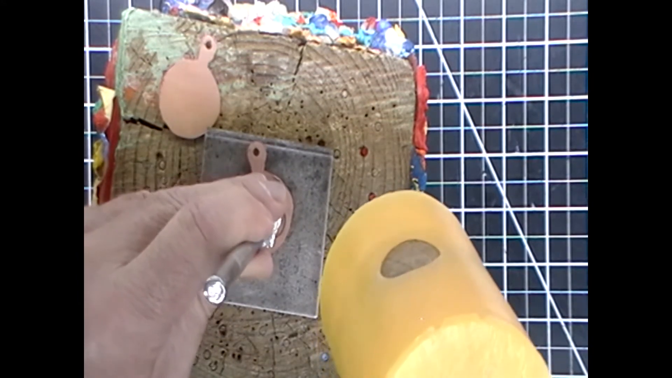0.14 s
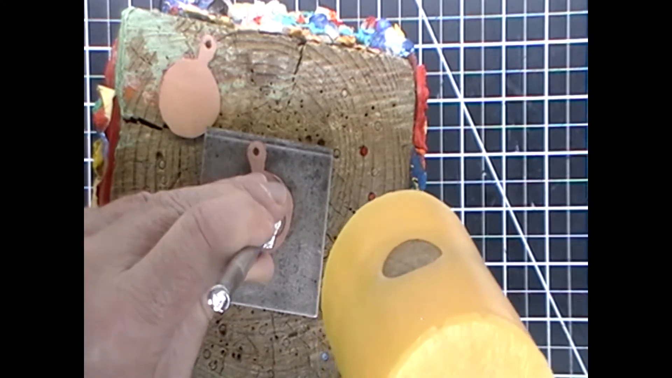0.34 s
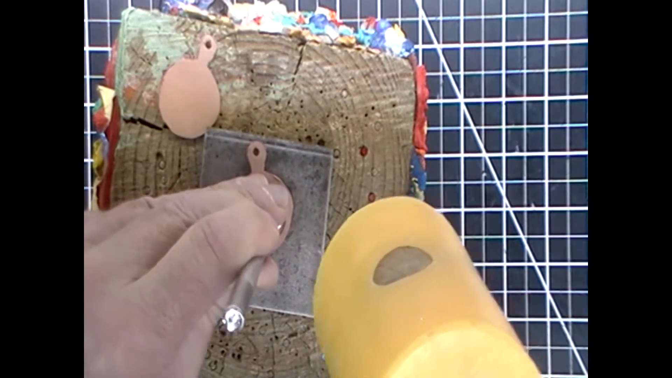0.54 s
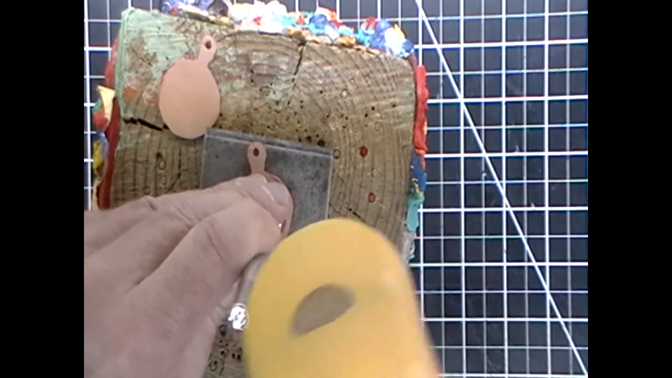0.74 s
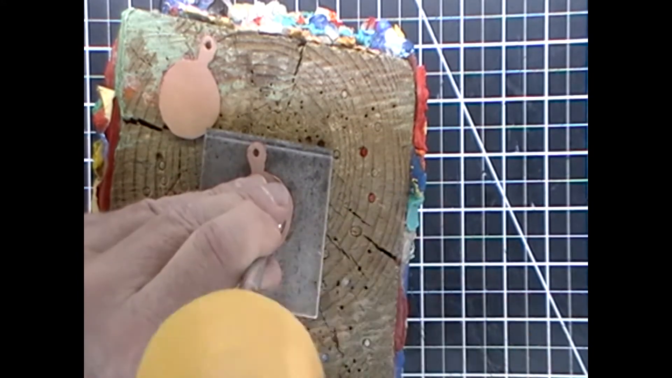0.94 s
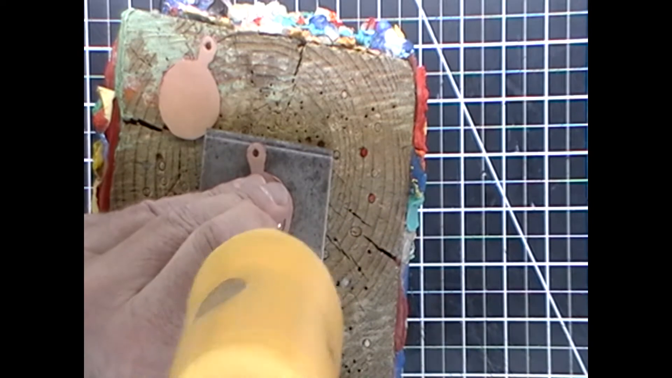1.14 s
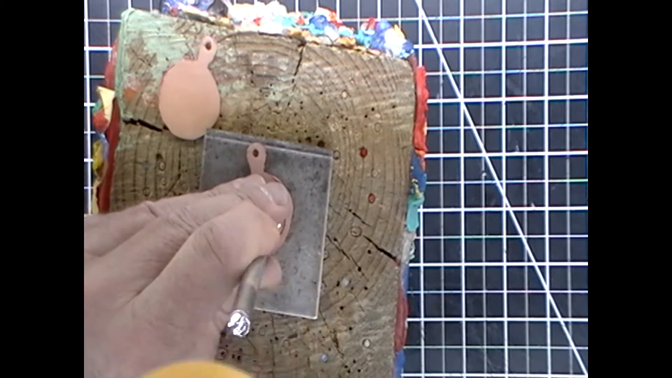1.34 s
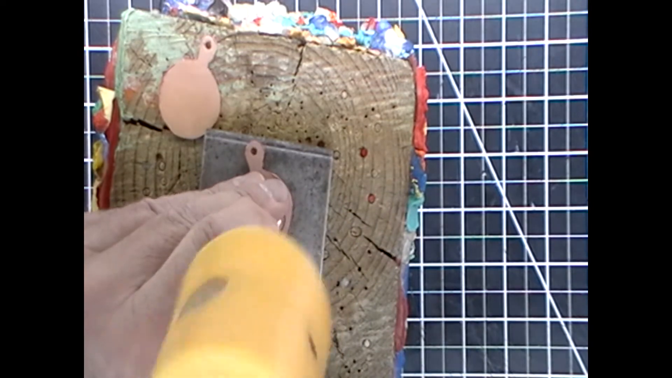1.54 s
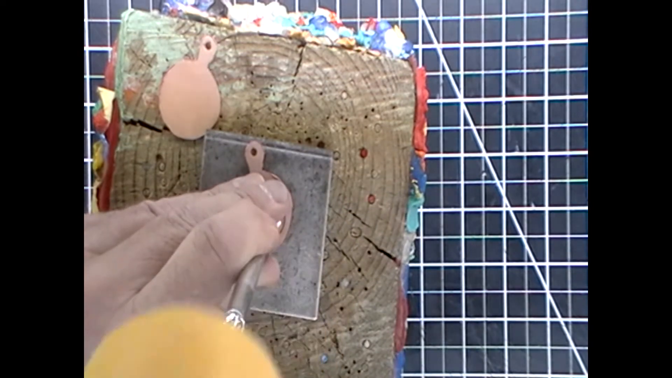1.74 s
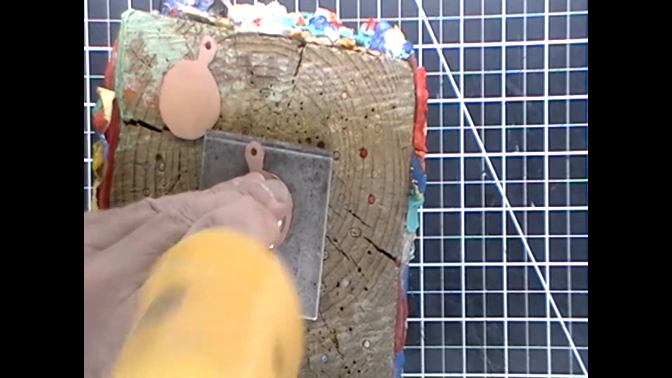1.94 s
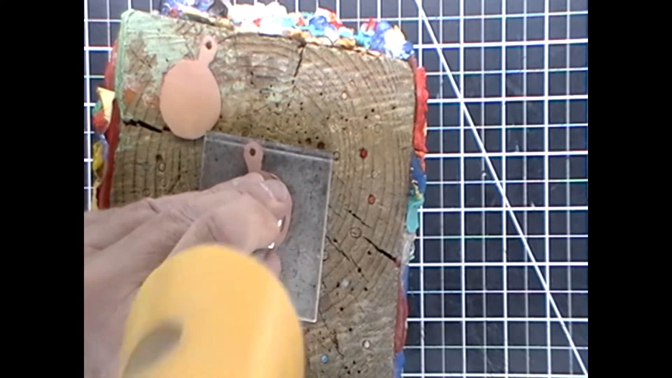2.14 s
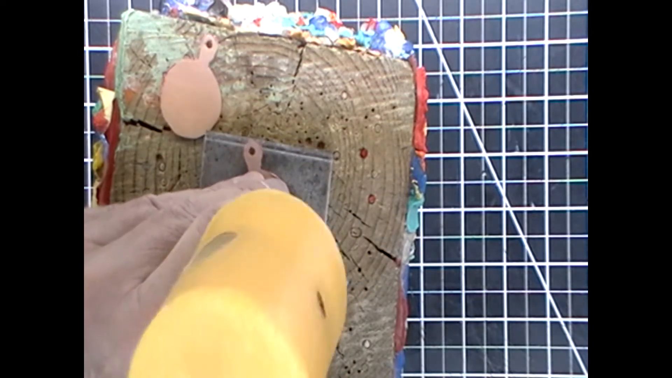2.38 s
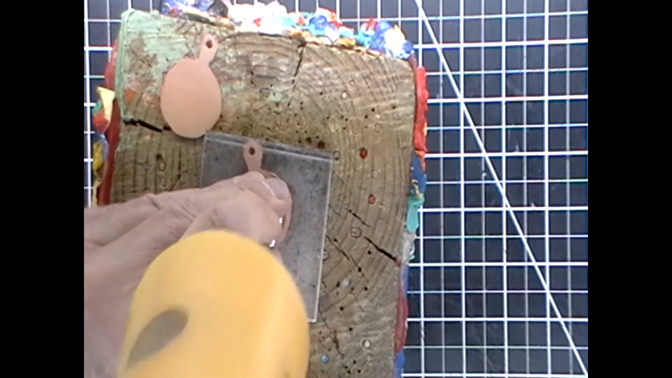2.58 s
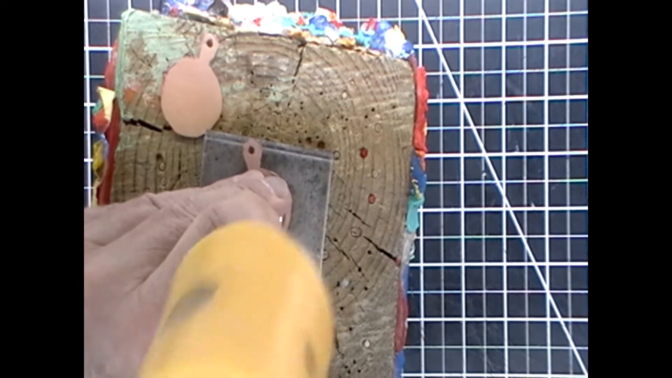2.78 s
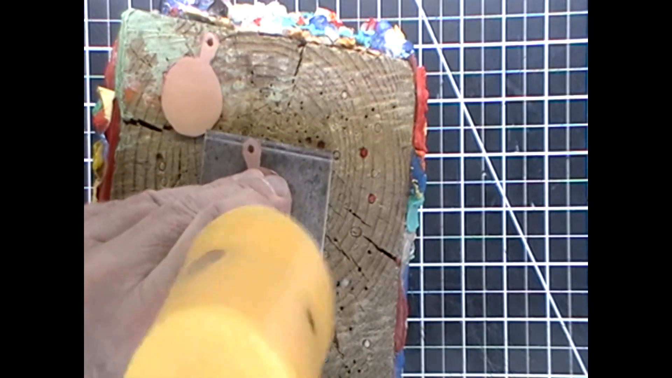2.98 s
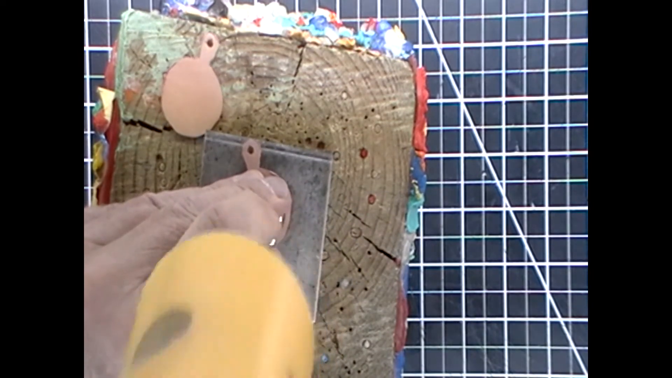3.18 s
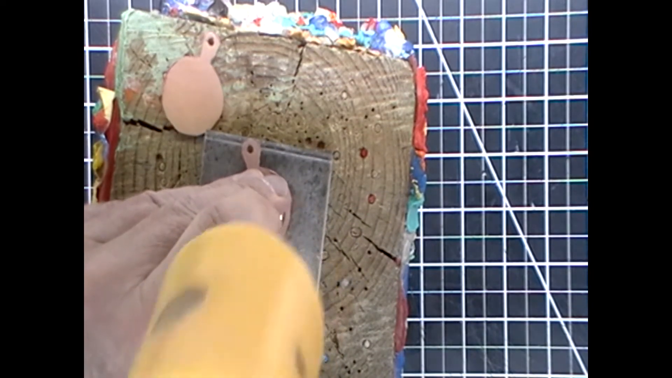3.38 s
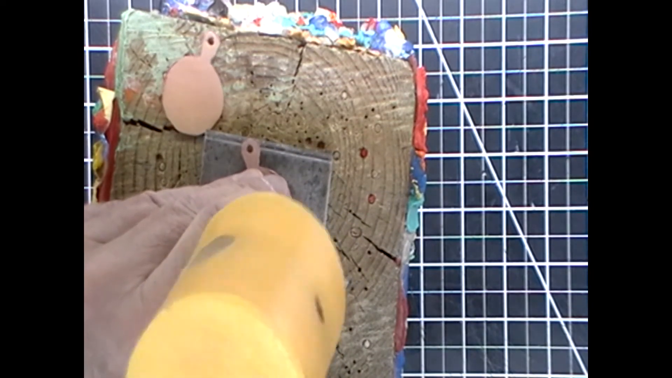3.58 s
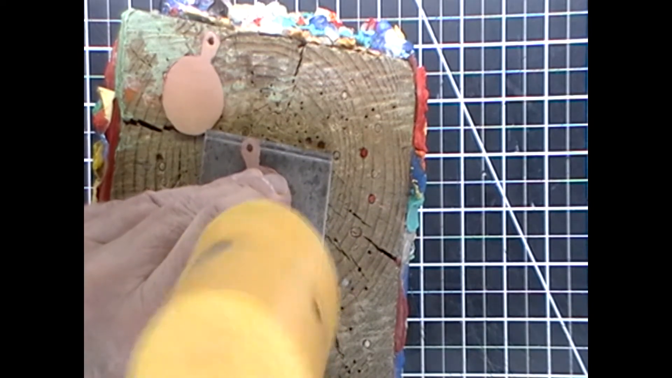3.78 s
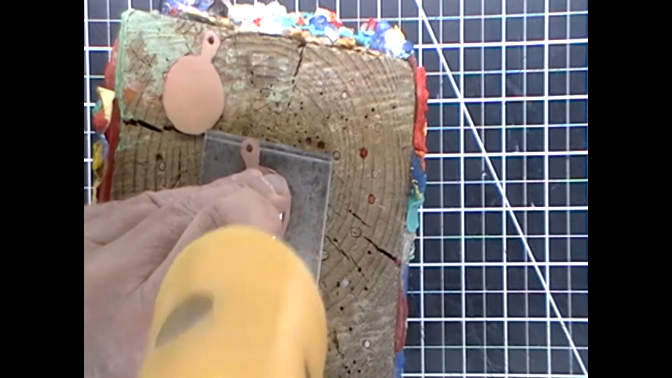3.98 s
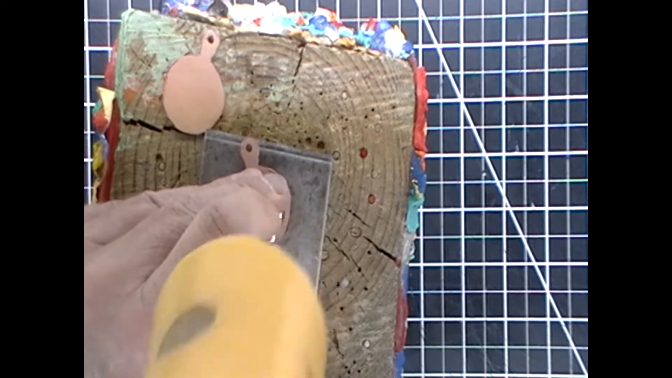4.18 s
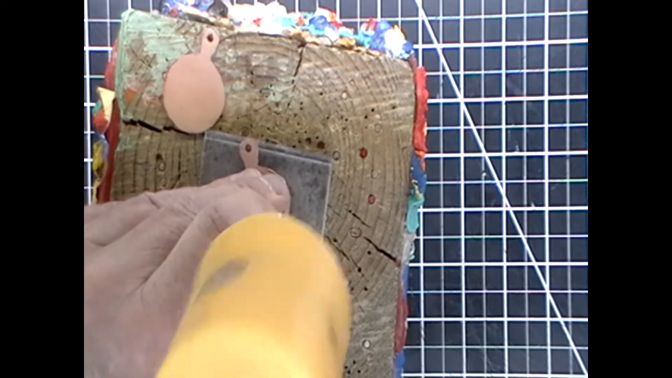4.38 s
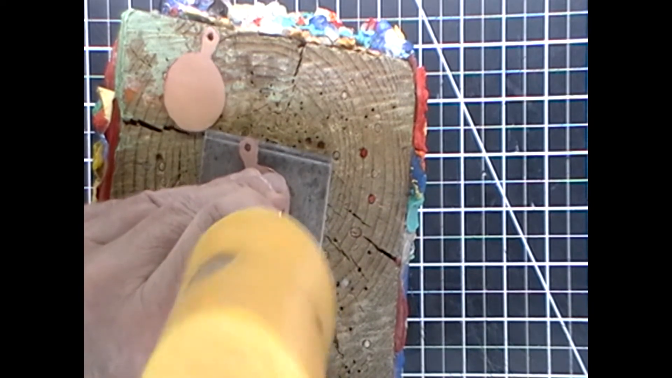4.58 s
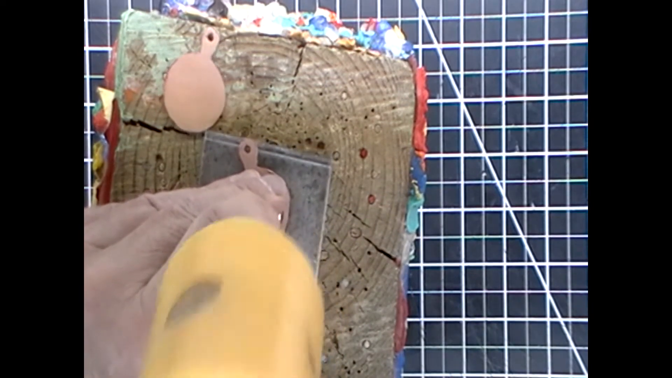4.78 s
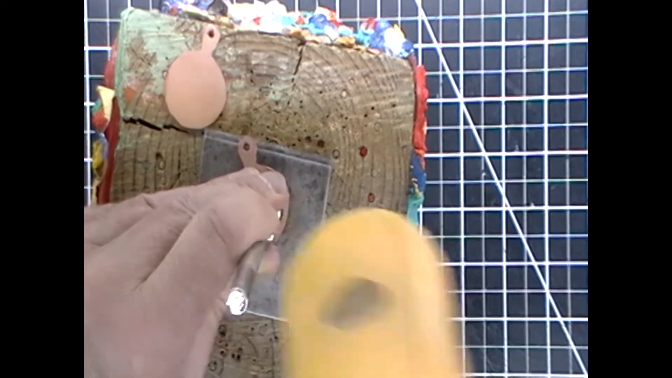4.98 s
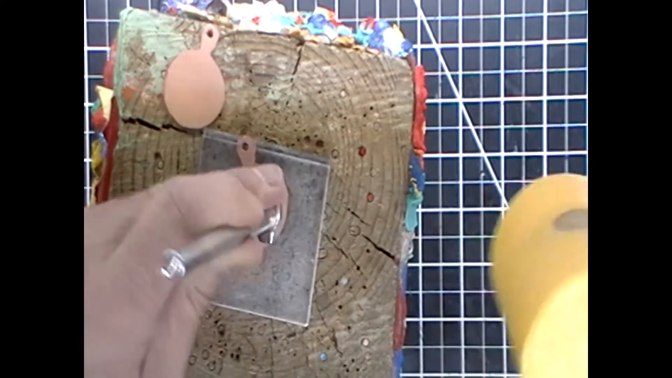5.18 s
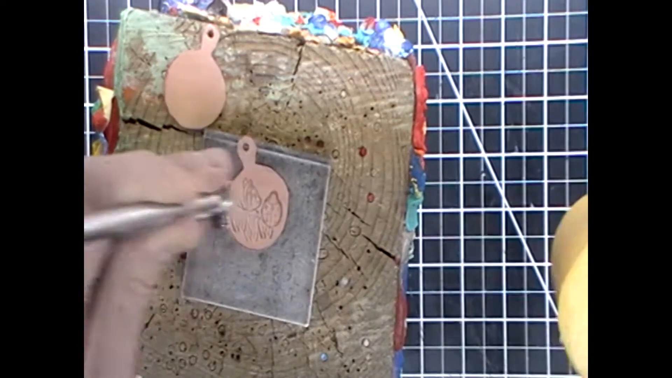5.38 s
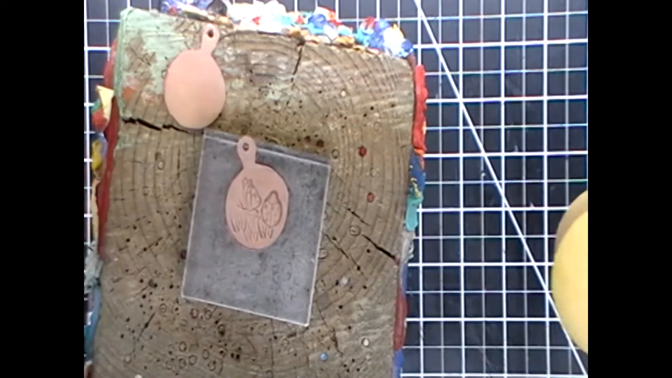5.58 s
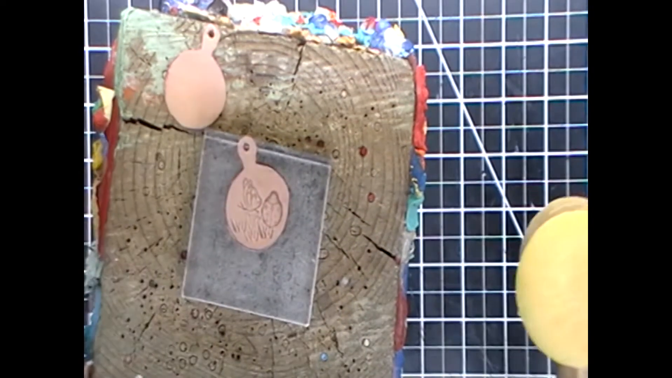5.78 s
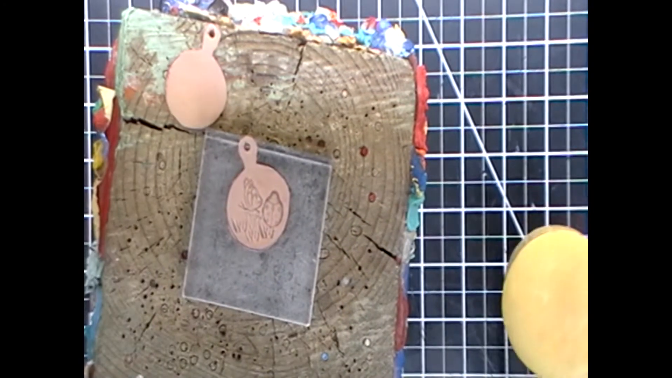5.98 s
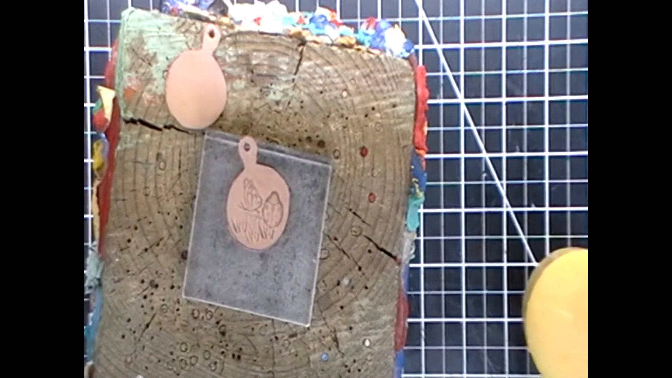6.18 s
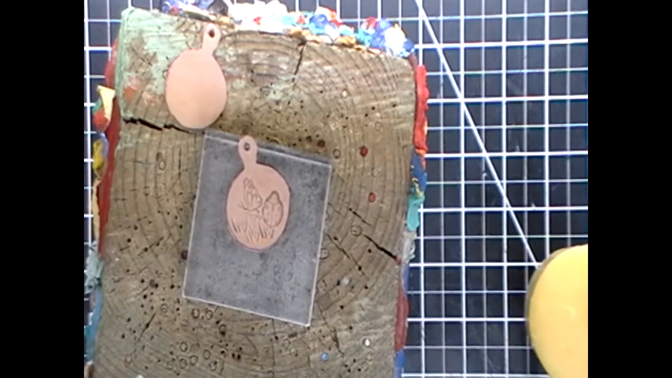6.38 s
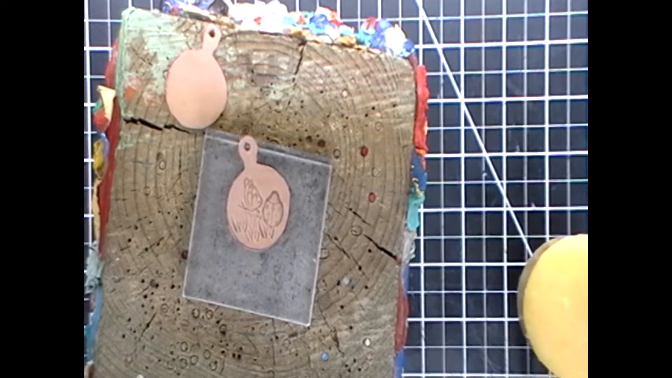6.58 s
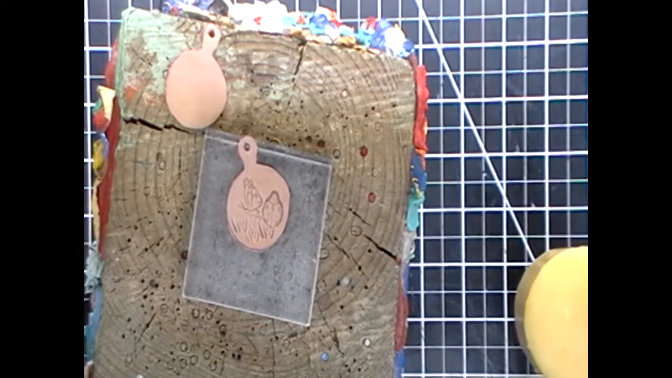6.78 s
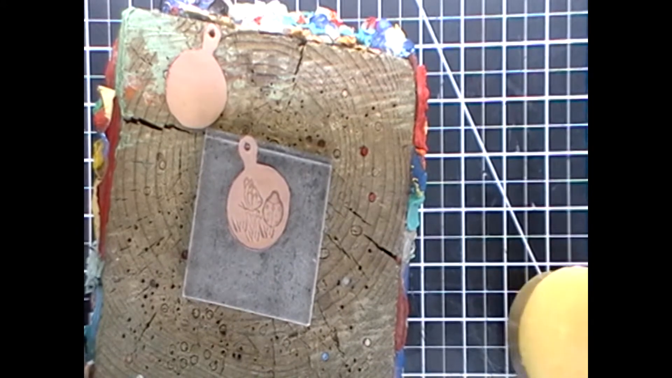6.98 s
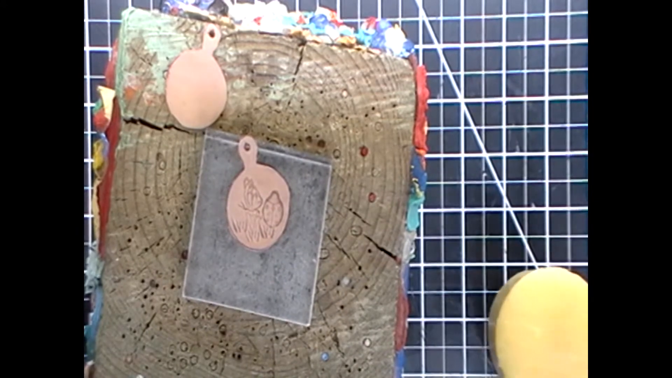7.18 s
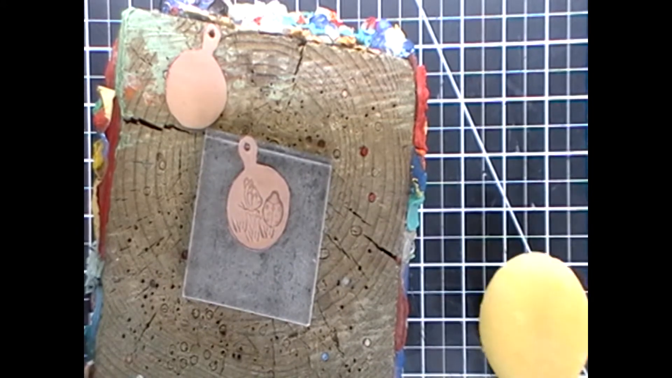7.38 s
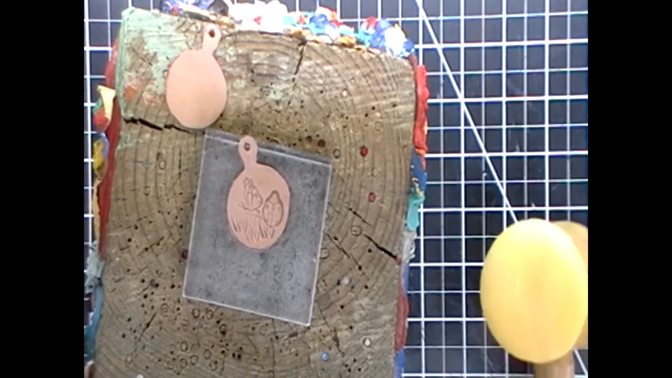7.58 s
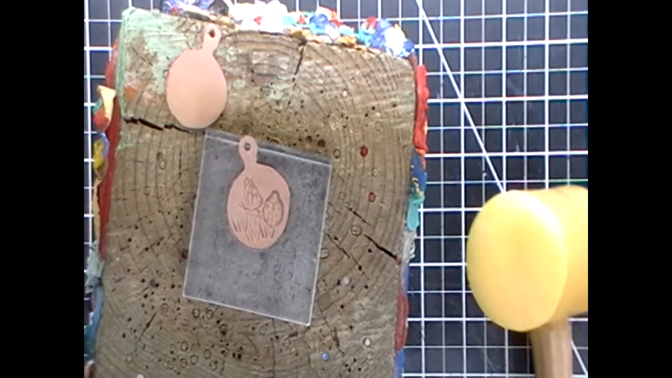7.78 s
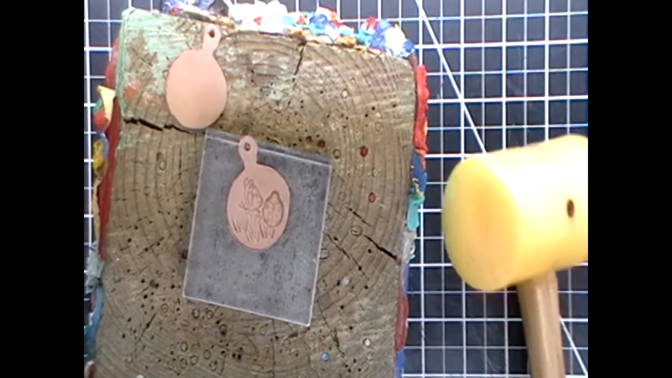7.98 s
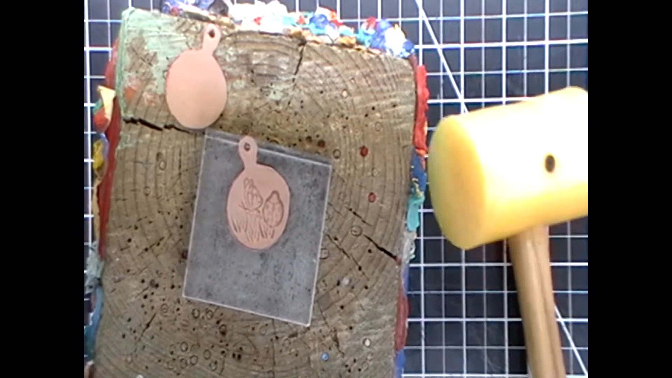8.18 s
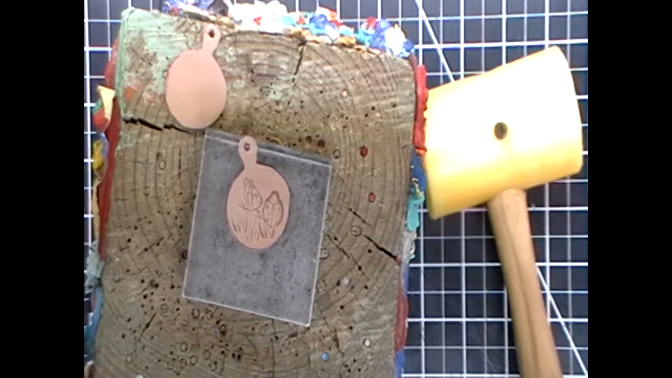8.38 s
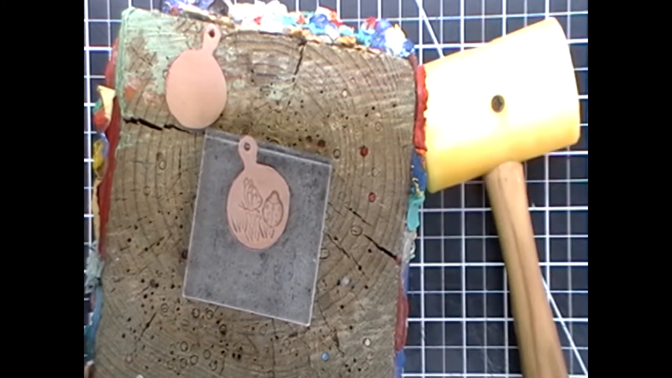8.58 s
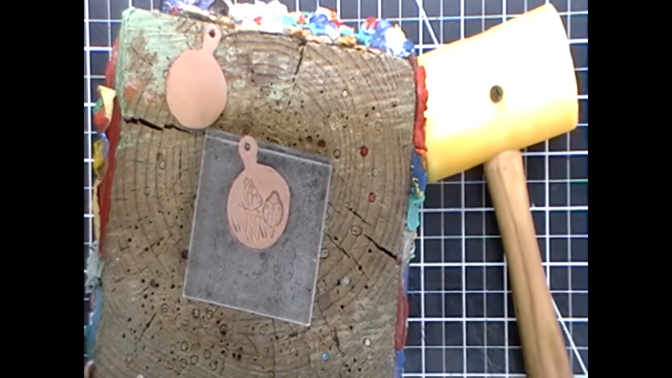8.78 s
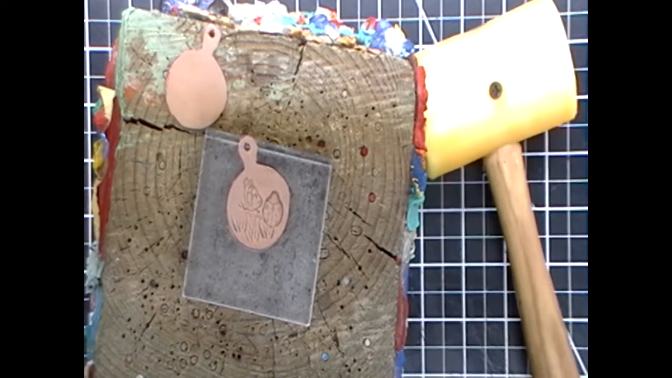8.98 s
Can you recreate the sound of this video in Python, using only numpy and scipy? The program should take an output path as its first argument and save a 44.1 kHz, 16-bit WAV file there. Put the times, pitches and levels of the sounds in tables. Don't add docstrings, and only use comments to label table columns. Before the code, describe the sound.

Close up in a small quiet workshop with a low fan hum, a plastic mallet hammers a steel stamp on a steel block over a wooden slab. Thirteen loud, sharp clacks come faster as they go, shaking the bench and overloading the microphone. The last ones have softer rebounds. After a pause come two desk knocks, wooden scrapes and bumps, a tiny metal clink, and the mallet laid down with a solid knock.

```python
import sys
import numpy as np
from scipy import signal
from scipy.fft import rfft, irfft
from scipy.io import wavfile
from scipy.ndimage import uniform_filter1d

SR = 44100
rng = np.random.default_rng(int(sys.argv[2]) if len(sys.argv) > 2 else 0)


def int16_out(signal):
    q = np.round(np.clip(np.atleast_2d(signal).T, -1, 1) * 32767)
    wavfile.write(sys.argv[1], SR, q.astype(np.int16))


def attenuation_scalar(level_db):
    decades = np.asarray(level_db, float) / 20
    return 10 ** decades


N = 398663


def evened(x):
    return x / np.sqrt(np.mean(x ** 2) + 1e-20)


def read(points, hz):
    f, value = np.transpose(points)
    return np.interp(np.log(hz + 1), np.log(f + 1), value)


def add(mix, s, sound):
    part = mix[:, round(s * SR):][:, :sound.shape[-1]]
    part += sound[..., :part.shape[1]]


def coloured(x, gain_db):
    size = x.shape[-1]
    gain = attenuation_scalar(gain_db(np.fft.rfftfreq(size, 1 / SR)))
    return irfft(rfft(x) * gain, size)


def smoothed_noise(shape, across, along):
    patches = uniform_filter1d(rng.standard_normal(shape), across, axis=0)
    return evened(uniform_filter1d(patches, along, axis=1))


def wide_noise(size, same, treble=0.):
    shared, apart = rng.standard_normal((2, size))
    apart = apart + treble * np.diff(apart, prepend=0)
    return shared + np.sqrt(np.clip(1 - same, 0, 1)) * apart * [[1], [-1]]


def stroke(rise, fall):
    ends_db, roundness = -22, 1.5
    t = np.arange(0, rise + fall, 1 / SR)
    return np.interp(t, [0, rise, rise + fall], [1, 0, 1]) ** roundness * ends_db


def rings(modes, bright=0., detune=0., rise=1e-4, flip=False, loose=0., size=SR // 2):
    wobble_db, uneven_db, lag_hz = 4, 3, 250
    hz, db, t60 = np.transpose(modes)[:, :, None]
    hz = hz * (1 + detune * rng.standard_normal(hz.shape))
    t = np.arange(size) / SR
    beat_hz, start = rng.uniform(7, 22, hz.shape), rng.random(hz.shape)
    uneven = rng.standard_normal(hz.shape)
    wobble = np.sin(2 * np.pi * (beat_hz * t + start))
    db = db + loose * (uneven_db * uneven + wobble_db * wobble)
    build_up = 1 - np.exp(-t / (rise * (1 + loose * lag_hz / hz)))
    level = attenuation_scalar(db + bright * np.log2(hz / 1000) - 60 * t / t60) * build_up
    side = (-1.) ** (flip * np.arange(len(modes)))[:, None]
    return (side * level * np.sin(2 * np.pi * hz * t)).sum(0)


# (frequency [Hz], level [dB per Hz])
HUM_COLOUR = [(15, -56), (25, -27), (48, -7.5), (85, -5.5), (121, 3), (160, -11.5), (202, -6), (245, -12),
              (368, -13), (630, -14.5), (1220, -17), (1510, -19.5), (3600, -27), (15200, -39.5),
              (16500, -53)]


def room_hum():
    hum_db, patch_db = -57, 2.2
    hz, _, z = signal.stft(wide_noise(N + 2048, 0.18), SR, nperseg=1024, noverlap=768)
    patches = smoothed_noise(z.shape[1:], 3, 14)
    drift_db = patch_db * patches / (1 + (hz[:, None] / 1800) ** 2)
    z = z * attenuation_scalar(read(HUM_COLOUR, hz)[:, None] + drift_db)
    hum = signal.istft(z, SR, nperseg=1024, noverlap=768)[1]
    return attenuation_scalar(hum_db) * evened(hum[:, :N])


def hum_swell():
    rise_db_per_s, shaken_db, settle_s = 0.24, 3.5, 0.14
    t = np.arange(N) / SR
    stirred = sum((t > row[0]) * np.exp(-abs(t - row[0]) / settle_s) for row in BLOWS + LAID_DOWN)
    return attenuation_scalar(rise_db_per_s * (t - t.mean()) + shaken_db * stirred)


# (start [s], length [s], pitch [Hz], level [dB], octave above [dB])
SQUEAKS = [
    (2.343, 0.036, 1250, -58, -3),
    (2.912, 0.17, 996, -58.5, -13),
    (6.079, 0.085, 1000, -63.5, -22),
    (7.713, 0.04, 1872, -61, -20),
    (8.081, 0.16, 615, -48.5, -12),
]


def squeaks(mix):
    for s, length, hz, db, octave_db in SQUEAKS:
        t = np.arange(0, length, 1 / SR)
        tone = np.sin(2 * np.pi * hz * t) + attenuation_scalar(octave_db) * np.sin(4 * np.pi * hz * t)
        add(mix, s, attenuation_scalar(db) * tone * np.sin(np.pi * (t / length) ** 0.6) ** 2)


# (start [s], rise [s], fall [s], peak level [dB])
RUSTLE = [
    (.74, 0.063, .05, -67),
    (.83, .03, 0.12, -68),
]


def rustle(mix):
    cloth = [(1500, -44), (3000, 5), (10000, -3.5), (14000, -9)]  # Hz, dB
    for s, rise, fall, db in RUSTLE:
        level = attenuation_scalar(db + stroke(rise, fall))
        hiss = coloured(wide_noise(len(level), 0.87), lambda hz: read(cloth, hz))
        add(mix, s, evened(hiss) * level)


# (time of peak [s], half length [s], centre pitch [Hz], level [dB])
SCUFFS = [
    (7.2, 0.009, 4100, -63),
    (7.85, .02, 4100, -60),
    (7.1, 0.011, 4500, -59),
    (7.585, .012, 2700, -59),
    (9.3, .02, 4000, -65),
    (8.1, 0.054, 4100, -62),
]


def scuffs(mix):
    for s, length, centre_hz, db in SCUFFS:
        t = np.arange(0, 2 * length, 1 / SR)
        puff = coloured(wide_noise(len(t), 1.0), lambda hz: -np.minimum(12 * abs(hz - centre_hz) / 900, 50))
        add(mix, s - length, attenuation_scalar(db) * evened(puff) * np.sin(np.pi * t / (2 * length)) ** 2)


# (start [s], hold [s], let-go [s], level [dB])
LEANS = [
    (7.744, 0.12, 0.028, -38.5),
]
# (frequency [Hz], level [dB])
LEAN_TONES = [(88, -6), (139, 1), (205, -8.5), (254, 0.5)]


def leans(mix):
    for s, hold, release, db in LEANS:
        t = np.arange(0, hold + release, 1 / SR)
        tones = np.zeros(len(t))
        for hz, tone_db in LEAN_TONES:
            rocking = np.sin(2 * np.pi * (rng.uniform(10, 10.5) * t + rng.random()))
            tones += attenuation_scalar(tone_db + 5.6 * rocking) * np.sin(2 * np.pi * hz * t)
        weight = np.interp(t, [0, .004, hold, hold + release], [0, 0.96, 0.56, 0.033])
        add(mix, s, attenuation_scalar(db) * evened(tones) * weight)


# (start [s], press [s], let-go [s], peak level [dB], rumble over peak [dB])
DRAGS = [
    (6.785, 0.018, 0.14, -48, 1.5),
    (7.235, 0.029, 0.058, -54, -9),
    (7.42, 0.18, .12, -43.5, -15.5),
    (7.743, 0.0055, 0.16, -52, 0),
    (7.82, 0.02, 0.074, -45.5, -10),
    (7.891, 0.068, 0.1, -54.5, -3),
]
# (frequency [Hz], level [dB])
DRAG_HISS = [(300, -36), (410, -11), (520, -15), (620, 2), (860, -18), (2180, -25), (3200, -27),
             (4400, -29), (6000, -37), (9000, -39), (13000, -65)]
# (frequency [Hz], level [dB], time to die by 60 dB [s])
DESK = [(142, -11, 0.22), (255, -3, 0.31), (378, -6.5, 0.19), (456.4, -4.5, 0.18), (617.5, -11, 0.4),
        (725, -6, 0.19), (1240, -18, 0.19), (1465, -22.5, 0.25), (1890, -22.5, 0.091), (2250, -26, 0.067)]
# (frequency [Hz], level [dB], time to die by 60 dB [s])
THUMP = [(106, -17, .09), (139, 5.5, 0.11), (214, -7, 0.17), (250.2, 3.5, 0.5)]


def drags(mix):
    slips_per_s = 900
    for s, rise, fall, db, low_db in DRAGS:
        level = attenuation_scalar(db + stroke(rise, fall))
        size = len(level)
        slips = (rng.random(size) < slips_per_s / SR) * attenuation_scalar(4.2 * rng.exponential(1, size))
        slips = slips * rng.standard_normal(size)
        body = evened(signal.fftconvolve(slips, rings(DESK[2:], bright=0.54, size=6000))[:size])
        hiss = evened(coloured(wide_noise(size, 0.96) + 0.9 * slips, lambda hz: read(DRAG_HISS, hz)))
        rumble = signal.fftconvolve(np.tile(slips, 2), rings(THUMP, size=6000))
        rumble = evened(rumble[size:][:size])
        add(mix, s, level * (attenuation_scalar(-14.0) * body + attenuation_scalar(-5.0) * hiss + attenuation_scalar(low_db) * rumble))


def crack(bright):
    colour = [(300, -10.5), (1500, -2.5), (5000, -3.0), (16000, -26)]  # Hz, dB
    burst = coloured(wide_noise(600, 0.94, 1.5),
                     lambda hz: read(colour, hz) + bright * np.log2(hz / 1000 + .1))
    return burst * attenuation_scalar(-60 * np.arange(600) / SR / 0.026)


# (time [s], strength [dB], brightness [dB per octave])
CLINKS = [
    (8.0603, -27, 2.5),
]
# (frequency [Hz], level [dB], time to die by 60 dB [s])
STEEL = [(2750, -12, .07), (4880, -17, .13), (5050, -17, .09), (7181, -14, .05), (7327, -3, .15),
         (9114, -10, .11), (9330, -13, .12), (9620, -11, .08), (13870, -32, .15), (14560, -16, .05),
         (14700, -21, .1), (14830, -23, .09)]


def clinks(mix):
    tick_colour = [(1000, 2.5), (5000, 7), (9000, 10), (16000, -12)]  # Hz, dB
    for s, db, bright in CLINKS:
        tick = coloured(wide_noise(3000, 0.83), lambda hz: read(tick_colour, hz))
        fingers = attenuation_scalar(-14 / (1 + np.exp(-(np.arange(9000) / SR - .097) / .004)))
        add(mix, s, attenuation_scalar(db - 20.5 + 2.1 * bright - 60 * np.arange(3000) / SR / 0.18) * tick)
        add(mix, s - .001, attenuation_scalar(db - 35) * crack(13.0))
        steel = rings(STEEL, bright, rise=0.0021, loose=0.38, size=9000)
        add(mix, s, attenuation_scalar(db) * fingers * steel * attenuation_scalar([[-1], [1]]))


# (frequency [Hz], time to die by 60 dB [s])
ROOM = [(50, .55), (130, .36), (350, .26), (920, .175), (2430, .19), (4500, .2), (8000, .16)]


def dense_ring(noise, colour, bright, stretch, spot_hz, focus_db, bands):
    grain_db = 1.2
    hz, t, z = signal.stft(noise, SR, nperseg=512, noverlap=384)
    near_spot = np.exp(-(np.log2((hz + 1) / spot_hz) / .2) ** 2)
    db = read(colour, hz) + bright * np.log2(hz / 1000 + .1) + focus_db * near_spot
    db = db + sum(lift_db * np.exp(-((hz - centre) / width) ** 2) for centre, width, lift_db in bands)
    z = z * attenuation_scalar(grain_db * smoothed_noise(z.shape[1:], 3, 7))
    dying_db = 60 * t / (stretch * read(ROOM, hz)[:, None])
    tail = signal.istft(z * attenuation_scalar(db[:, None] - dying_db), SR, nperseg=512, noverlap=384)[1]
    tail = tail / abs(tail[:, :2000]).mean() / 8
    arrival = 1 - np.exp(-(np.arange(tail.shape[1]) / SR / 0.0023) ** 2)
    return tail * arrival


def hits(mix, rows, clack, body, colour, spot_db, focus_db, body_db, ring_db, stretch, alike,
         touch=1e-4, swell=0.017, rattle=.1, bands=(), size=11000):
    usual = wide_noise(size, 0.94, treble=1.5)
    for s, db, hz, bright, shake_db in rows:
        s = s + .001
        own = wide_noise(size, .94, treble=1.2)
        noise = alike * usual + np.sqrt(np.clip(1 - alike ** 2, 0, 1)) * own
        noise = noise * attenuation_scalar(0.47 * evened(uniform_filter1d(rng.standard_normal(size), 90)))
        snap = rings(clack[2:] + [(hz, spot_db, .03)], bright, detune=0.02, rise=touch, size=3000)
        thud = -rings(clack[:2], bright, detune=0.01, rise=touch, size=4000)
        add(mix, s, attenuation_scalar(db) * snap * attenuation_scalar([[-.7], [.7]]))
        add(mix, s, attenuation_scalar(db - 9.5) * crack(bright) * 1e-4 / touch)
        add(mix, s + .0006, attenuation_scalar(db) * thud * attenuation_scalar([[-1.2], [1.2]]))
        support = rings(body, detune=0.005, rise=swell, flip=True, loose=1, size=size)
        add(mix, s, attenuation_scalar(db + body_db + shake_db) * support * attenuation_scalar([[-.5], [.5]]))
        ring = dense_ring(noise, colour, bright, stretch, hz, focus_db, bands)
        add(mix, s, attenuation_scalar(db + ring_db + rattle * shake_db) * ring)



TICKS = [
    (5.1896, -57.5, 7500, 0.26, -18),
    (5.354, -31.5, 8250, 0.58, -36),
]
TICK_CLACK = [(3150, -12, 0.0098), (5650, 10.5, 0.0014), (8800, 13.5, 0.0019), (11700, 1, 0.0042)]
TICK_RING = [(710, -52), (1200, -30), (2530, -11), (5840, -9), (6650, -8), (8260, -4.5), (16000, -19.5)]


def ticks(mix):
    hits(mix, TICKS, TICK_CLACK, DESK, TICK_RING, spot_db=-14, focus_db=-3.5, body_db=-19,
         ring_db=-6.5, stretch=0.75, alike=0.22)


NUDGES = [
    (6.797, -31, 2120, -5.5, -13),
    (6.81, -31.5, 2130, -5.5, 6.5),
    (7.485, -43.5, 620, 6, 1),
    (7.553, -50, 2130, 4, -5),
    (7.582, -35, 1420, -5, -16),
    (7.624, -37.5, 2093, -7.5, -5),
    (7.849, -43, 2100, -2, -3),
    (7.969, -42, 1360, 5.5, 4),
]
NUDGE_CLACK = [(426, -10.5, 0.071), (620, -13.5, 0.071), (1650, -15, 0.0396), (3570, -22, .015)]
KNOCK_RING = [(88, -49.5), (150, -28), (260, -5.5), (725, -2), (1440, -1.5), (1870, -7), (2350, -6.5),
              (3570, -10.5), (6940, -27.5), (7630, -21.5), (14000, -53)]


def nudges(mix):
    hits(mix, NUDGES, NUDGE_CLACK, DESK, KNOCK_RING, spot_db=0, focus_db=8, body_db=-18.5,
         ring_db=-4, stretch=0.98, alike=1.0, touch=0.0062)


SOFT_KNOCKS = [
    (6.4340, -37, 1700, -2.3, -3),
    (8.0737, -32, 1660, -1, -2),
]
SOFT_CLACK = [(476, -12.5, .04), (780, -8, .03), (1250, -3, .025), (1500, -6, 0.023), (2150, -10, 0.018),
              (2710, -17, .02)]


def soft_knocks(mix):
    hits(mix, SOFT_KNOCKS, SOFT_CLACK, DESK, KNOCK_RING, spot_db=-4.0, focus_db=8.5, body_db=-7.5,
         ring_db=2.0, stretch=0.85, alike=0.24, touch=.0008)


KNOCKS = [
    (6.1549, -24, 1950, -0.56, -2.5),
    (6.3232, -22, 620, -1.46, 0.5),
    (7.7461, -41, 2030, -1.3, 3),
    (8.4455, -31, 2530, 0, -19),
]
KNOCK_CLACK = [(300, -12, 0.018), (653, -9.5, 0.037), (1650, -7, 0.015), (2250, -5, 0.024),
               (3120, -6, 0.007), (3600, 9, 0.0017), (4350, -6, 0.0049), (7250, -4.5, 0.0026)]


def knocks(mix):
    hits(mix, KNOCKS, KNOCK_CLACK, DESK, KNOCK_RING, spot_db=-3.5, focus_db=8.0, body_db=-7.5,
         ring_db=0.5, stretch=0.93, alike=0.72, swell=0.0059, rattle=0.55)


LAID_DOWN = [
    (8.393, -4.5, 1290, 0.4, 1.6),
]
LAID_CLACK = [(470, -2.5, 0.035), (745, -3, 0.06), (1420, 8.5, 0.0072), (1950, -9, 0.014),
              (2370, -5, 0.014), (3230, -5.5, 0.0084), (3750, -17, .01), (4370, -12, 0.0087),
              (4890, -7.5, 0.0071), (9200, -16, 0.004)]
LAID_DESK = [(157, -13, .26), (254.8, 0, 0.26), (391, 1.5, 0.21), (456, -1.5, 0.083), (608, -15, 0.36),
             (764, -4.5, 0.17), (953, -14, 0.3), (1055, -26.5, 0.53), (1217, -11, 0.14), (1297, -8, 0.2),
             (1520, -14.5, 0.17), (1660, -11, .18), (1906, -20, 0.14), (2400, -20, .1)]
LAID_RING = [(47, -36), (80, -16.5), (239, -6.5), (747, -3.5), (909, -4.5), (1260, -7), (1790, -16.5),
             (2490, -21), (3460, -31), (4700, -35), (15000, -67)]


def laid_down(mix):
    hits(mix, LAID_DOWN, LAID_CLACK, LAID_DESK, LAID_RING, spot_db=-16, focus_db=5, body_db=-10.0,
         ring_db=0.0, stretch=1.26, alike=0.53, size=17000, touch=0.0002)


GLANCING = [
    (1.1328, -1.1, 1650, .3, -9),
]
GLANCING_CLACK = [(520, -13, 0.014), (1221, -8, 0.025), (1650, 2.5, 0.01), (2060, -8, 0.018),
                  (2780, -11, 0.019), (3220, -12.5, .014), (3650, -16.5, .012), (4350, -19, 0.014),
                  (6250, -11.5, .012)]
BENCH = [(56, -8, 0.51), (83.6, -4, 0.41), (112.7, -3.5, 0.36), (149, -6.5, 0.25), (221.3, -9.5, 0.34),
         (253, -1, .29), (371, -7, 0.25), (443.6, -7, .22), (514.4, -8, 0.071), (561, -3, 0.25),
         (608, -21.5, 0.3), (664, -6.5, .15), (772, -4, 0.12), (822, -7, 0.17)]
GLANCING_RINGS = [(62, 0.5, .5), (90.7, 7, 0.45), (120, 3.5, 0.35), (1200, -3.5, 0.15), (1437, -1.5, 0.11),
                  (1570, -5, 0.17), (1653, -2, 0.23), (1730, -1, .25), (2060, -6, .13), (2767, -2.5, .12),
                  (3005, -7, .12), (3440, -6.5, .13), (6100, -10.5, .14)]
GLANCING_RING = [(24, -35), (40, 7.5), (354, -9.5), (503, -5), (831, -9.5), (1680, -0.5), (2500, -15.5),
                 (2770, -8.5), (4460, -30.5), (6020, -20), (16000, -72)]


def glancing_blow(mix):
    hits(mix, GLANCING, GLANCING_CLACK, BENCH + GLANCING_RINGS, GLANCING_RING, spot_db=-13, focus_db=1.0,
         body_db=-24.5, ring_db=-9.0, stretch=0.93, alike=0.2, size=17000, swell=0.0064)


REBOUNDS = [
    (4.391, -21.5, 1265, -0.5, -8.5),
    (4.646, -16.5, 1667, -2.5, -7),
    (4.909, -16.5, 1660, -2, -22),
]
BLOW_CLACK = [(680, 8, 0.012), (788, 6, 0.011), (2563, 4, 0.012), (3380, 7, 0.0042), (4440, -6, 0.015),
              (6160, -7.5, 0.012), (9000, -16.5, 0.00096)]
BLOW_RING = [(30, -27.5), (60, -3.5), (133, 0), (320, -12.5), (490, -9), (700, 0), (1150, -10), (2050, -13),
             (2700, -12.5), (3700, -19.5), (4500, -22.5), (6200, -32), (9000, -43.5), (16000, -68.5)]


def rebounds(mix):
    hits(mix, REBOUNDS, BLOW_CLACK, BENCH, BLOW_RING, spot_db=-1.5, focus_db=3.0, body_db=-15.5,
         ring_db=-5.0, stretch=0.75, alike=0.36, touch=0.00052)


BLOWS = [(1.571, -5, 2150, 2.5, 2), (2.021, -2, 2074, 1.5, 0), (2.379, -4, 1626, 0, 1),
         (2.705, -3.5, 1627, 1, 1.8), (3.012, -2, 1315, 1, -0.5), (3.298, -2, 1320, 0.5, -1),
         (3.572, -3.5, 1380, 1, 0.65), (3.837, -5, 1584, 1, 3.5), (4.094, -4.5, 1615, 0.5, 0.5),
         (4.343, -1.5, 1283, 1.5, 0.6), (4.606, 0, 1340, 1, -0.5), (4.874, -4.5, 1443, 2, 5)]
SLAB = [(852, -8, .13), (940, -10, 0.16), (960, -10.5, .14), (1062, -8.5, 0.1), (1240, -10.5, 0.13),
        (2230, -13.5, 0.075), (2370, -11.5, 0.11)]
BLOCK = [(1001, -12, .22), (1684, -7, .16), (1920, -13.5, 0.2), (2153, -9, .12), (2530, -6.5, .12),
         (2620, -10, .19), (2750, -8, .11), (3000, -10.5, .11), (3170, -15, 0.25), (3640, -16.5, .22),
         (4130, -13, 0.11), (4400, -17.5, 0.18), (5900, -21.5, 0.13), (6140, -24, 0.19)]
# (centre [Hz], width [Hz], level [dB])
BLOCK_BANDS = [(1870, 95, -4.5), (2390, 67, -4), (2630, 170, 1), (3400, 150, -3), (3920, 78, -7.5),
               (4360, 100, 2.5), (5500, 120, -4.5), (6800, 150, -4)]


def blows(mix):
    hits(mix, BLOWS, BLOW_CLACK, BENCH + SLAB + BLOCK, BLOW_RING, spot_db=-4, focus_db=0.5,
         body_db=-17.5, ring_db=-0.56, stretch=0.96, bands=BLOCK_BANDS, size=17000, alike=.87,
         swell=0.0045, rattle=0.33)


def scene():
    mix = room_hum() * hum_swell()
    blows(mix)
    rebounds(mix)
    glancing_blow(mix)
    knocks(mix)
    soft_knocks(mix)
    nudges(mix)
    laid_down(mix)
    ticks(mix)
    clinks(mix)
    drags(mix)
    leans(mix)
    scuffs(mix)
    rustle(mix)
    squeaks(mix)
    return mix


CEILING = [
    [.56],
    [.77],
]


def overloaded(dry):
    over = dry / CEILING
    return CEILING * over / (1 + abs(over) ** 8) ** (1 / 8)


def band_limit(x):
    return signal.sosfilt(signal.butter(12, 16740, fs=SR, output="sos"), x)


def record(dry):
    flat = overloaded(dry)
    flat = signal.sosfilt(signal.butter(6, 48, "highpass", fs=SR, output="sos"), flat)
    flat = signal.oaconvolve(flat, signal.firwin(127, 16000, fs=SR)[None], "same")
    return band_limit(flat)


dry = scene()
out = record(dry)
int16_out(out)
```